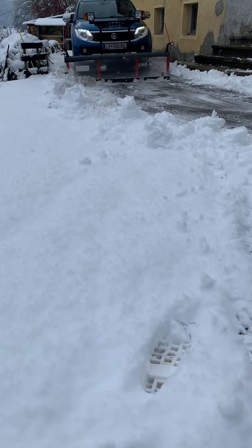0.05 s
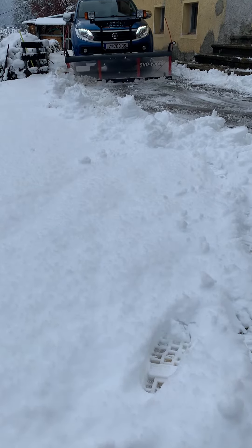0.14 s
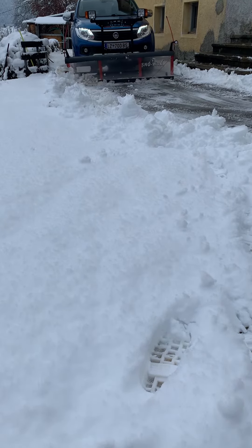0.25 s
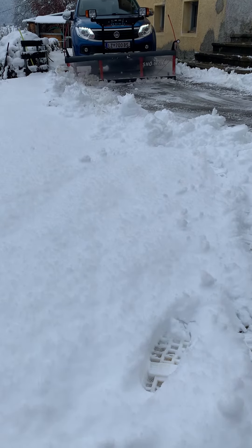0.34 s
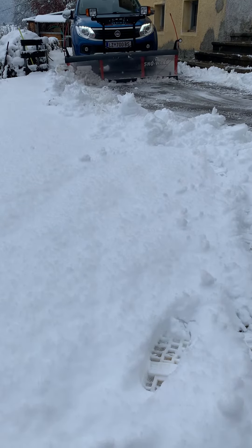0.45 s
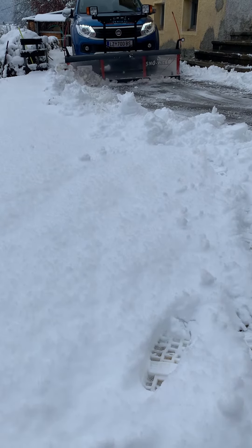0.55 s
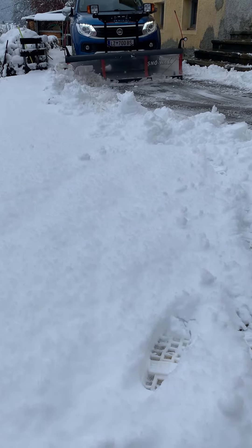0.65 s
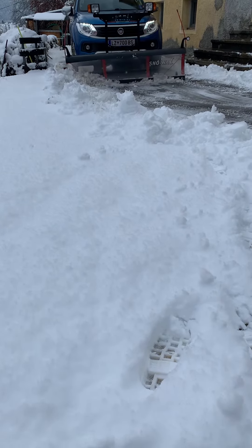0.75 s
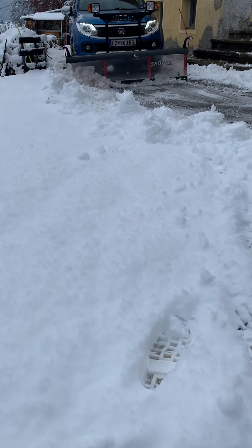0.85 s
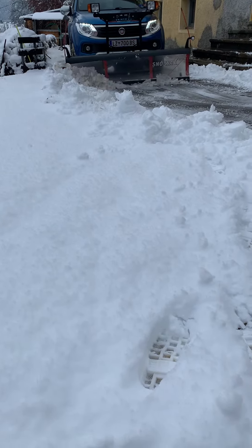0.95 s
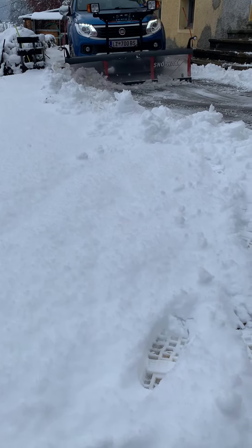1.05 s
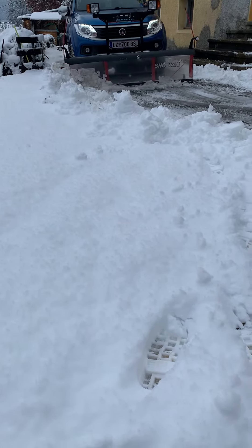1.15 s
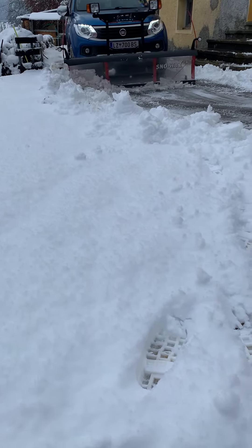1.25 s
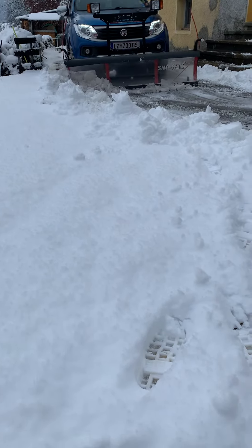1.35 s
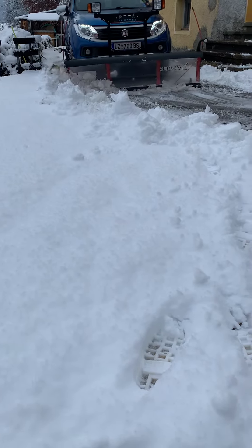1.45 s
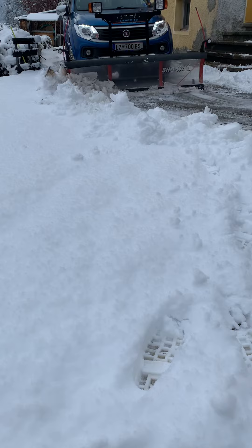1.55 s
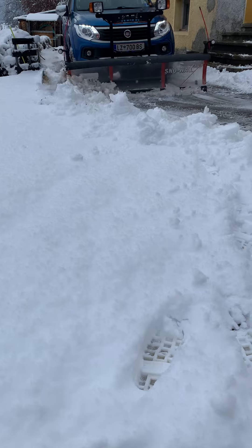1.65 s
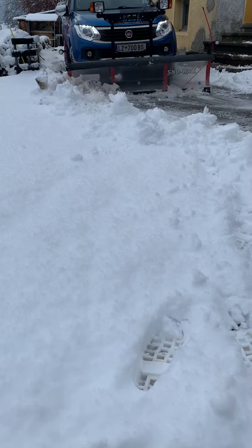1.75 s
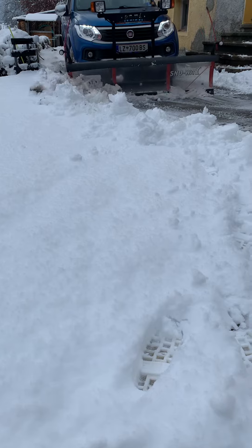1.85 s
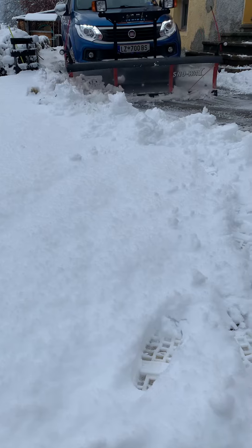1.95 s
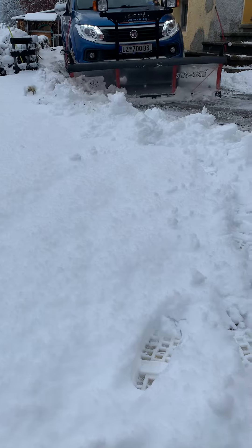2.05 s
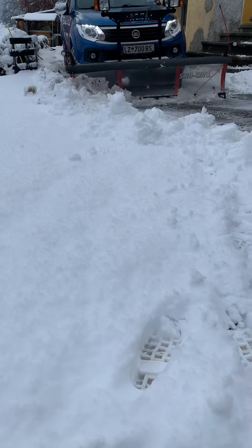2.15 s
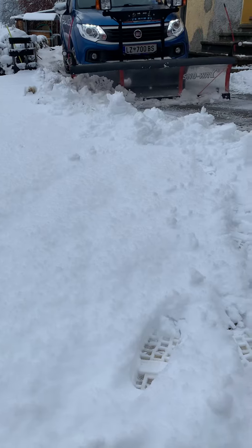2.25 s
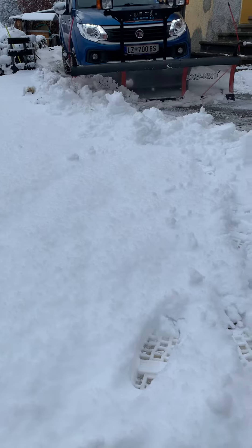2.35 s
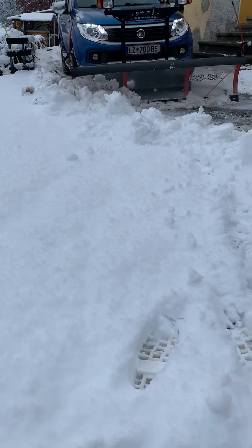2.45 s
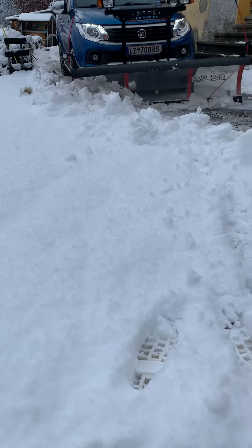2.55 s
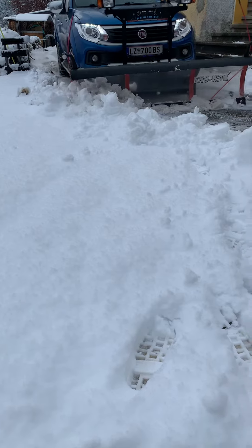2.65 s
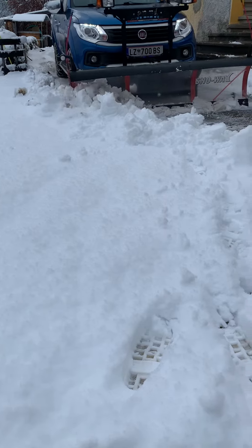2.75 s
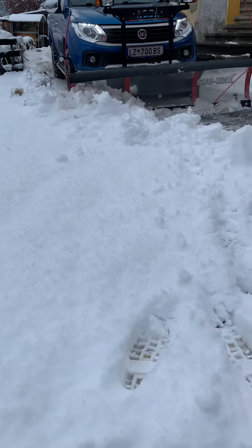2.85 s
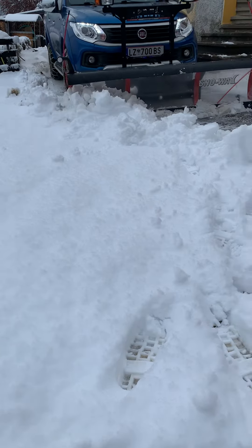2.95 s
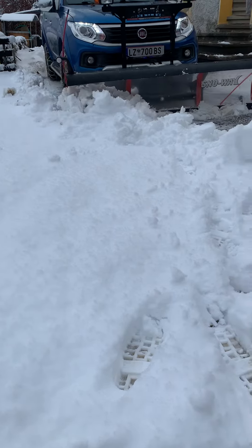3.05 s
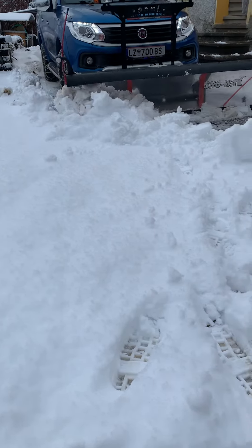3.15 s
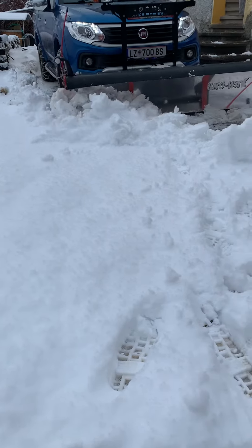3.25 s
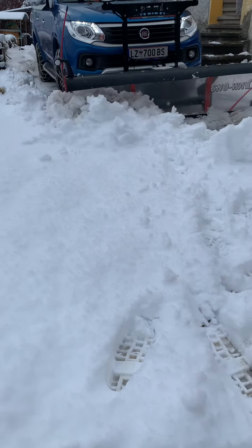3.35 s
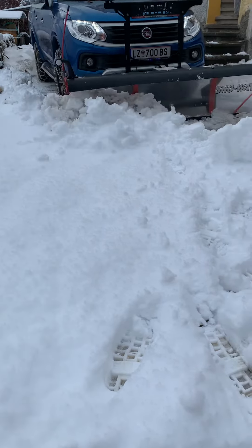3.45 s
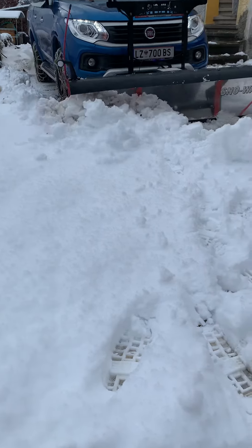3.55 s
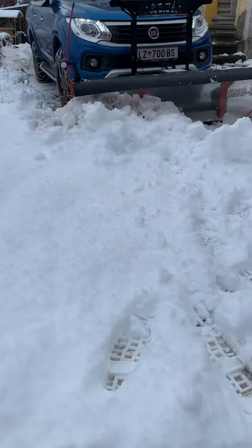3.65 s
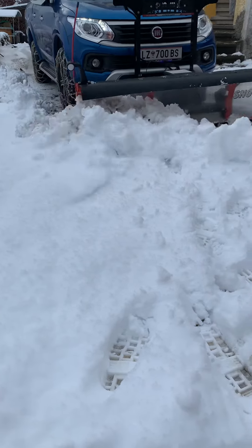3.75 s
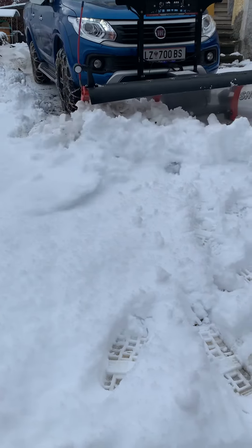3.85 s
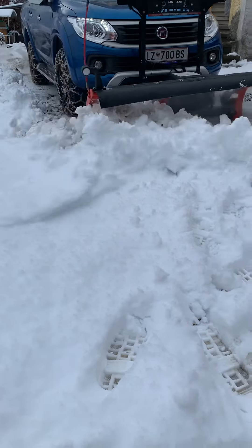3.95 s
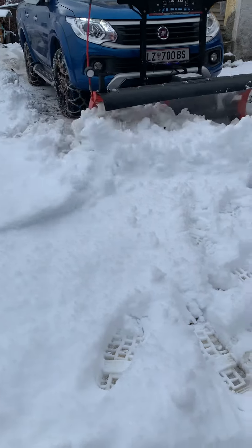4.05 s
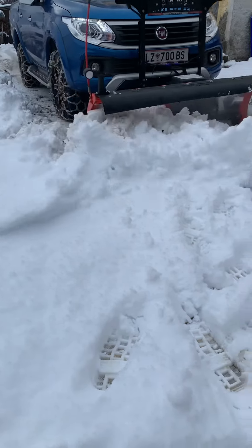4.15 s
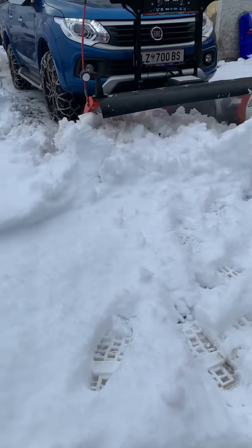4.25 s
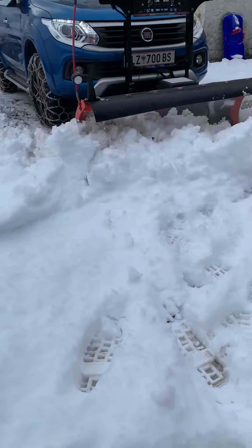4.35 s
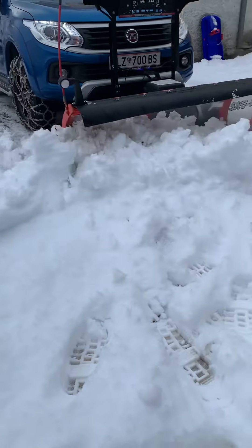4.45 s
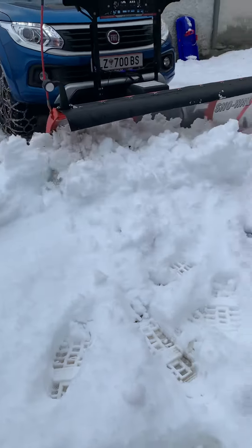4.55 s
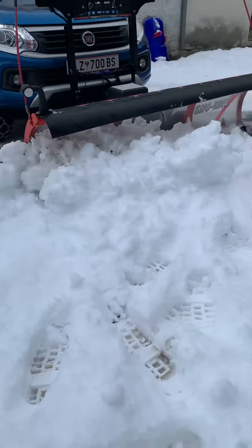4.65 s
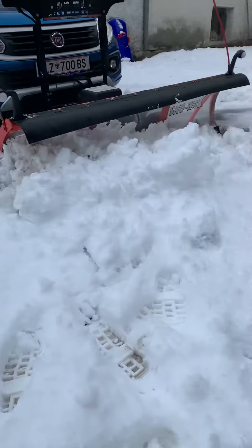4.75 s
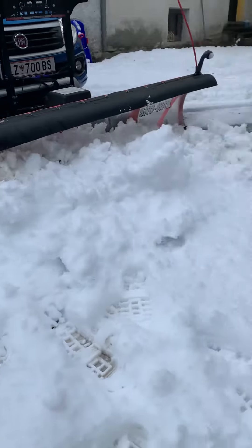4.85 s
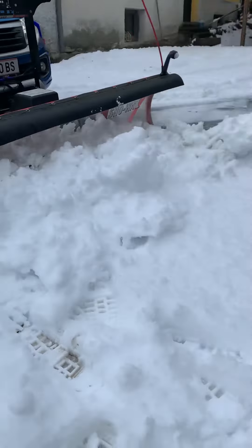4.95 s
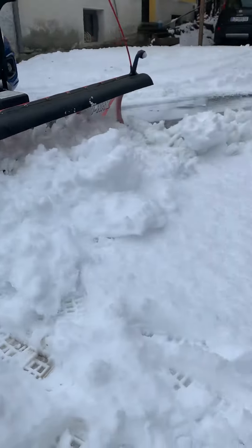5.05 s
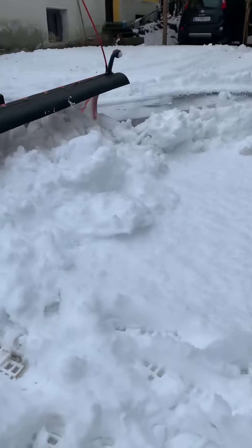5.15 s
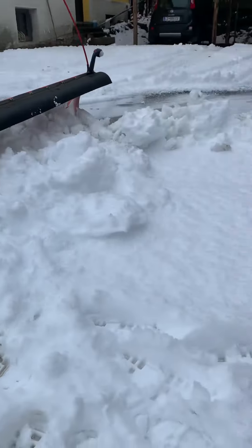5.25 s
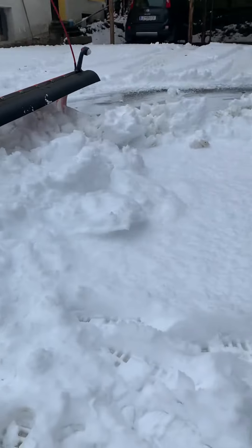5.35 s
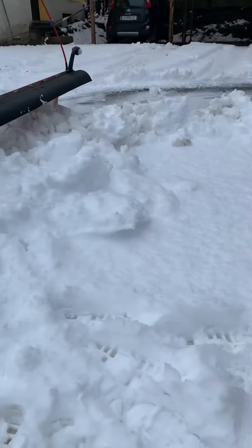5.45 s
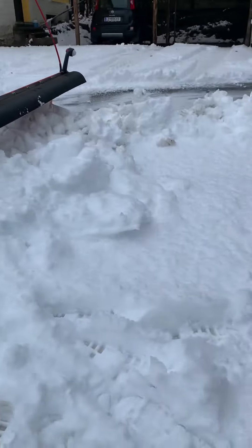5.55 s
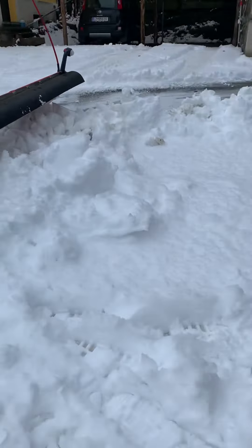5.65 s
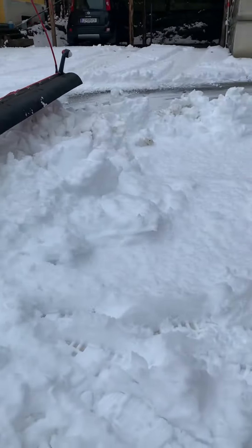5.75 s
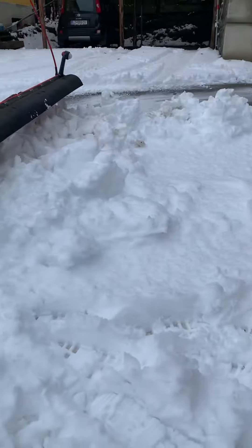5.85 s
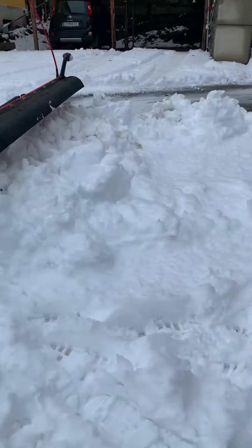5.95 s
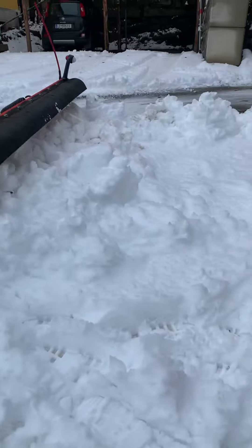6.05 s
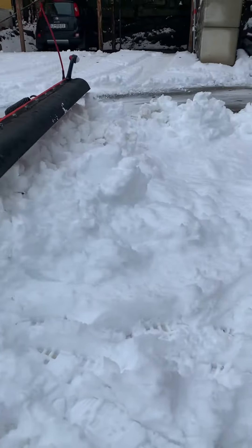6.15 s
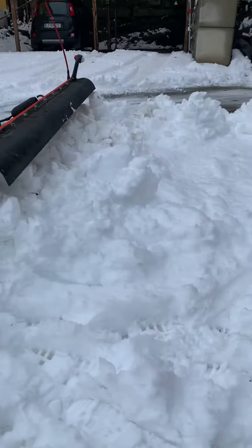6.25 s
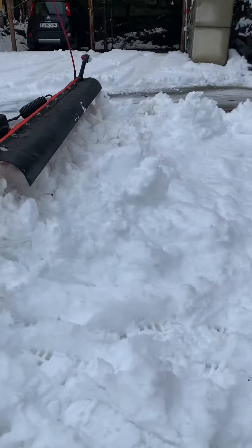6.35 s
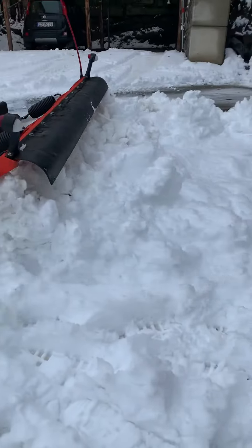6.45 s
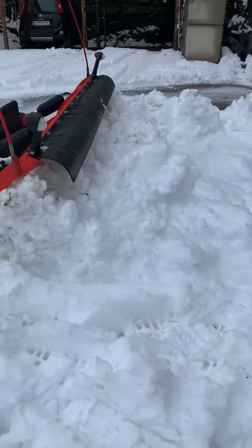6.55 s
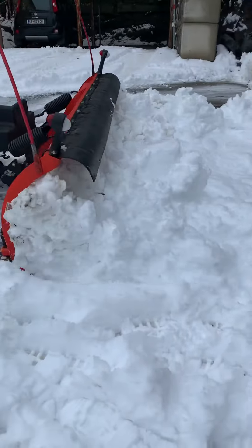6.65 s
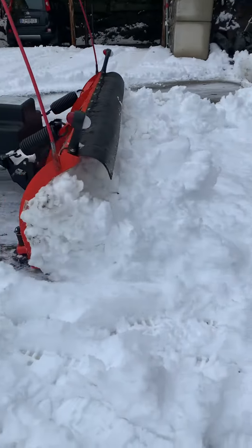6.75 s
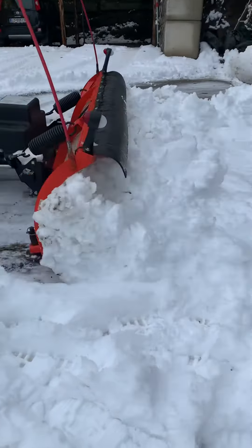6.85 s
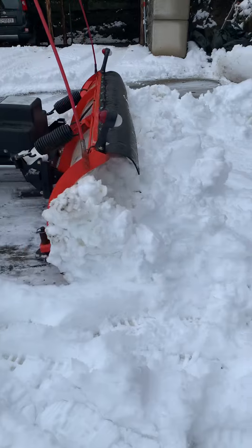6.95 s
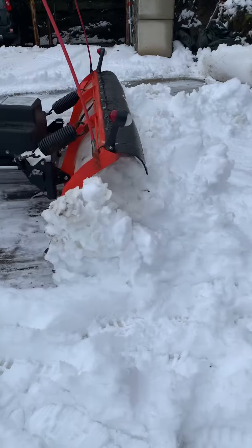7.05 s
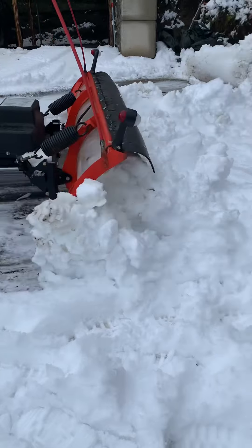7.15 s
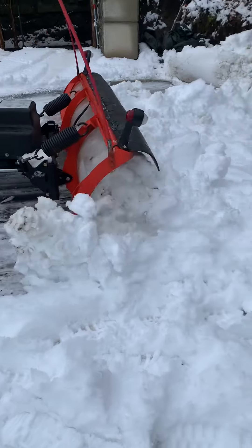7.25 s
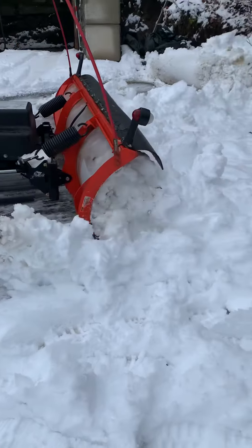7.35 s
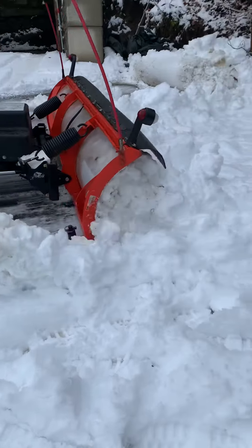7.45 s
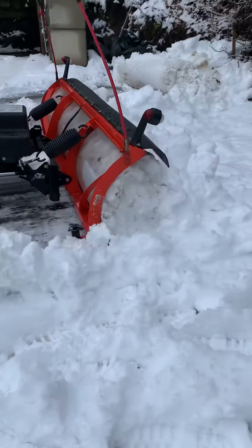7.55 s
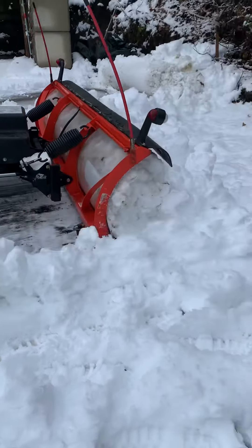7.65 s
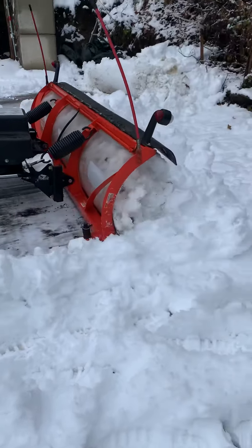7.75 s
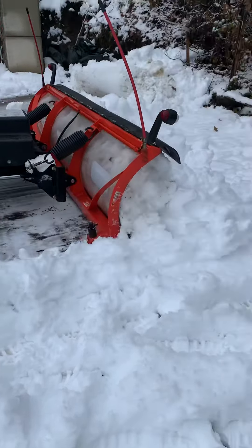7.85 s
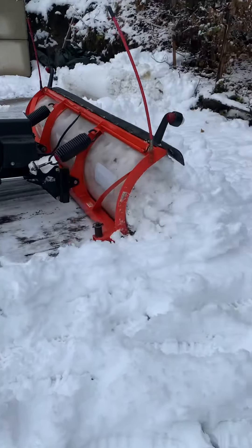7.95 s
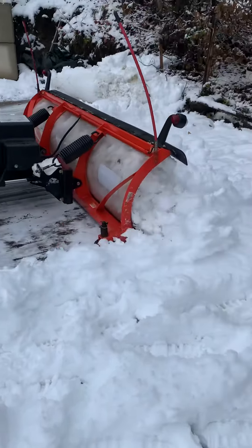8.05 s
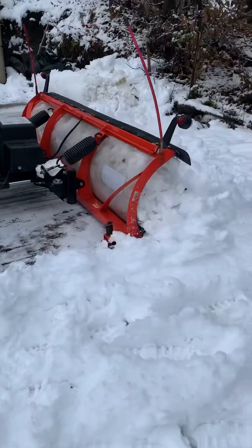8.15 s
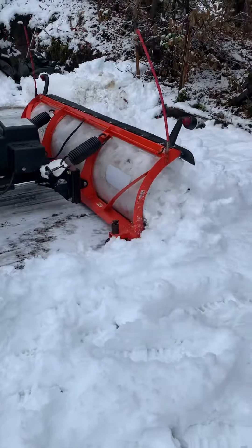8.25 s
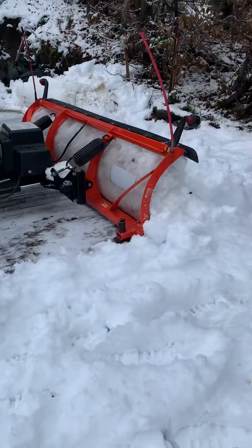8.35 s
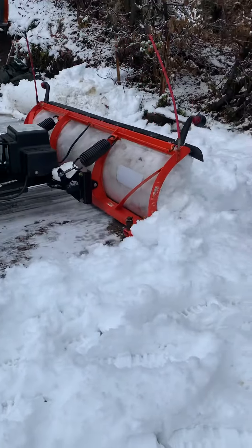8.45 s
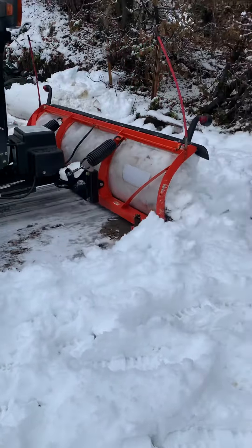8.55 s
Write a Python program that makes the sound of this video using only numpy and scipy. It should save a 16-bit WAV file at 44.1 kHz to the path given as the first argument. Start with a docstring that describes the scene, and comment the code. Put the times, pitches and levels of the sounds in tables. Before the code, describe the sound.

A rough, juddering metal scrape dominates, swelling as the edge bites into packed snow and briefly thinning when it lifts. Sharp knocks, brittle ice cracks and deep short thuds break through, over low diesel tones, clatter and a faint whine. It is heard close outdoors in stereo, with slight reflections from nearby walls. Finally the blade stops and the engine idles on.

```python
"""A steel plough blade scrapes along a snowy lane: it judders over the paving and rings, in random slips.
Noise shakes its resonances, and the same slips crush the snow; ice cracks and sudden catches stand out.
The frame thuds in short damped waves, and the diesel pickup adds exhaust tones, clatter and a faint whine.
The truck passes a phone held a few metres off, then stops: the scraping drops and the engine idles on."""
import sys
import numpy as np
from scipy import signal
from scipy.fft import rfft, irfft, next_fast_len
from scipy.io import wavfile
from scipy.ndimage import uniform_filter1d, map_coordinates

SR = 44100
rng = np.random.default_rng(int(sys.argv[2]) if len(sys.argv) > 2 else 0)


def transcribe(u):
    """Save the signal u as a 16-bit wav file named by the first command-line argument.

    u: samples, shape (n,) or (channels, n), limited to [-1, 1]; the rate is SR.
    q: integer samples, one column per channel.
    """
    v = np.clip(np.atleast_2d(u).T, -1, 1)
    q = np.round(v * 32767).astype(np.int16)
    wavfile.write(sys.argv[1], SR, q)


def ratio_of_db(decibels):
    """Turn decibels (scalar or array-like) into linear amplitude factors; 0 dB maps to 1."""
    return 10 ** (np.asarray(decibels, float) / 20)


N = 378812
T = np.arange(N) / SR
LENGTH = next_fast_len(N)
BINS = np.arange(LENGTH // 2 + 1) * SR / LENGTH  # frequencies in Hz
SPAN = 2 * (len(BINS) - 1)  # transform length
PASSED = np.interp(T, (4.61, 5.14), (0, 1))  # 0 = truck ahead, 1 = alongside


def unit(x):
    """Scale to rms 1."""
    return x / np.sqrt(np.mean(x ** 2))


def noise():
    """White noise."""
    return rng.standard_normal(N)


def turned(ahead_db, beside_db):
    """Gain that changes as the blade turns past."""
    ahead, beside = ratio_of_db(ahead_db), ratio_of_db(beside_db)
    return ahead + (beside - ahead) * PASSED


def ring(x, modes, widen, drift=0., tilt=((0, 1), (0, 0)), pivot_hz=620):
    """Sum of two-pole resonances; each can swell and fade as the load on the steel shifts."""
    out, knots = 0, np.arange(0, T[-1] + 1, .08)
    tilt_db = np.interp(knots, tilt[0], tilt[-1])  # per octave above pivot_hz
    for k, (hz, width, ahead_db, beside_db) in enumerate(modes):
        b, a = signal.iirpeak(hz, hz / (widen * width), SR)
        swell_db = drift * rng.standard_normal(len(knots)) + tilt_db * np.log2(hz / pivot_hz)
        gain = np.interp(T, knots, ratio_of_db(swell_db)) * turned(ahead_db, beside_db)
        out = out + (-1) ** k * gain * signal.lfilter(b, a, x)
    return out


def bursts(times, sizes, decay_s, rise_s):
    """Envelope of sudden onsets that die away."""
    spikes = np.bincount((np.asarray(times) * SR).astype(int), sizes, N)[:N]
    fall, rise = np.exp(-1 / (decay_s * SR)), np.exp(-1 / (rise_s * SR))
    fading = signal.lfilter([1], [1, -fall], spikes)
    return signal.lfilter([1 - rise], [1, -rise], fading)


def grit(rate, spread_db, decay_s):
    """Random slips (rate per second): a steady bed with sudden grains of widely spread size on top."""
    chance = rng.random((int(rate * N / SR), 2))
    size_db = spread_db * np.minimum(-np.log(chance[:, 1]), 4.3)  # capped so no grain is huge
    grains = bursts(chance[:, 0] * T[-1], ratio_of_db(size_db), decay_s, 0.0006)
    return unit(1.02 + unit(grains))


# Resonances of the steel, low to high: (f/Hz, width/Hz before each use widens or narrows it,
# relative level/dB while the truck is ahead, relative level/dB once alongside)
MOUNT_MODES = [(59.5, 37, -5.5, -5.5), (77.8, 18.5, -2, 3), (95, 18.2, 1, 0.5)]
FRAME_MODES = [(125, 29, -1.5, 0), (159, 29.5, -0.5, -1), (199, 41.4, -0.5, -1.5), (255, 69, -6, -3.5)]
PANEL_MODES = [(342.5, 90, -3, -2), (441, 118, -3.5, -2), (541.5, 84, -1, -0.5), (651, 62.5, -3, -3.5),
               (701, 61.4, -1.5, -2), (837, 104, -3, -3.5), (978, 164, -8, -7.5)]
EDGE_MODES = [(1164, 160, -1.5, -3.5), (1419, 56, 2, 1.5), (1517, 92, 3, 0.5), (1694, 105, 1.5, -1),
              (1800, 67, 0, 3), (2020, 183, -5, -1), (2230, 223, -6.5, -3), (2545, 270, -12, -8),
              (3084, 194, -8, -8.5), (3560, 520, -21, -20), (4390, 280, -39, -16.5)]


def blade(crunch_hiss):
    """Stick-slip of the edge shakes mount, frame, panel and edge; the same slips crush the snow."""
    slips, grains = grit(40, 7.5, 0.013), grit(320, 3.7, 0.0031)
    # the powers below set how strongly each kind of slip shakes a part
    boom_push = noise() * grit(14, 1.1, 0.0063) ** .5
    boom = ring(boom_push, MOUNT_MODES, 0.85)
    rumble_push = noise() * slips ** 0.35 * grit(60, 1.9, 0.0071) ** 0.31
    rumble = ring(rumble_push, FRAME_MODES, 0.93)
    panel_push = noise() * slips ** 0.13 * grit(200, 3.8, 0.0016) ** .5
    panel = ring(panel_push, PANEL_MODES, 1.0, drift=1.87, tilt=np.transpose(DRAG_LEVELS))
    edge_push = noise() * slips ** 0.2 * grains ** 0.45 * grit(50, 1.9, 0.0075) ** 0.36
    edge = ring(edge_push, EDGE_MODES, 0.82, drift=2.04, tilt=np.transpose(SLIDE_LEVELS), pivot_hz=1700)
    crackle = unit(ring(noise() * grit(120, 5.1, 0.0018) ** 1.38, EDGE_MODES, 1.8))
    scrape = unit(edge) + crackle * turned(-9, -2.5)
    snow = crunch_hiss * slips ** 0.59 * grains ** 0.2 * grit(25, 3.9, 0.01) ** 0.39
    layers = (boom, rumble, panel, scrape, snow)
    return sum(ratio_of_db(db) * unit(layer) for db, layer in zip(drag_db(), layers))


# Slow levels of the sliding steel, before bites, lifts and the stop:
# (t/s, mount boom level/dB, frame rumble level/dB, panel ring level/dB, panel tilt in dB per octave)
DRAG_LEVELS = [(0, -12.5, -17, -19, 0.5), (.4, -40, -20.5, -16, -0.5), (1.0, -19.5, -17.5, -18, 0.5),
               (1.6, -21.5, -16.5, -25, 3), (2.0, -16, -20, -20, 1), (2.45, -25.5, -18, -20, 4),
               (2.8, -22.5, -20, -21, 2.5), (3.2, -19.5, -16.5, -20, 2.5), (3.8, -19.5, -20.5, -23.5, -3.5),
               (4.2, -19, -19.5, -21, -5), (4.6, -21, -21.5, -24.5, -1.5), (5.0, -23.5, -25.5, -24.5, -4),
               (5.3, -21, -21.5, -26, -3.5), (6.0, -23, -25.5, -25.5, 2.5), (6.8, -22, -21.5, -24.5, 2),
               (7.4, -23.5, -25.5, -23, -2), (8.0, -22, -24, -26, 1)]
# The same for edge and snow: (t/s, scrape level/dB, crunch level/dB, edge tilt in dB per octave)
SLIDE_LEVELS = [(0, -29, -42.5, 1), (1.4, -27.5, -39, -0.7), (2.8, -30, -40.5, -0.5),
                (3.7, -30.5, -41, 1.5), (4.3, -31, -40.5, 8.5), (5.6, -29.5, -38.5, -1.9),
                (6.9, -27, -39, -2), (7.5, -30, -33, 4.5), (8.0, -30, -34.5, 5), (8.1, -31.5, -36, 4)]
# The edge bites into packed snow: (t/s of the peak, swell level/dB before the shares, rise/s, fade/s)
BITES = [(.1, 14, 0.38, 0.3), (1.21, 8, 0.066, 0.2), (1.66, 14, 0.16, 0.09), (2.02, 10, 0.037, 0.53),
         (2.64, 10, 0.024, 0.17), (3.08, 9, 0.11, 0.49), (3.24, 17, 0.024, 0.5), (3.62, 7, .1, 0.12),
         (3.89, 7, 0.035, 0.043), (4.1, 16, 0.046, 0.11), (4.21, 18.5, 0.24, 0.12),
         (4.58, 13.5, 0.053, 0.048), (4.72, 10, 0.023, 0.3), (5.07, 11.5, 0.45, 0.1),
         (6.03, 4, 0.15, 0.099), (6.27, 11.5, 0.025, 0.11), (6.39, 9.5, 0.083, 0.025),
         (6.87, 9, 0.17, 0.083)]
# The edge rides up and loses contact: (from t/s, to t/s, loss level/dB before the shares)
LIFTS = [(1.707, 1.98, 4), (3.17, 3.218, 3), (6.134, 6.222, 2), (6.458, 6.648, 5.5),]
# Share of each swell or loss, then loss level/dB at the stop: (boom, rumble, ring, scrape, crunch)
BITE_SHARES = (0.11, 0.18, 0.059, 0.37, 0.88)
LIFT_SHARES = (0.47, 0.9, 1, 0.74, 0.56)
STOP_LOSS_DB = (22, 18, 15, 9.4, 11.3)


def drag_db():
    """Levels of boom, rumble, ring, scrape and crunch: slow trend, up in bites, down in lifts and at the stop."""
    steel_s, *steel_db, _ = np.transpose(DRAG_LEVELS)
    slide_s, *slide_db, _ = np.transpose(SLIDE_LEVELS)
    trends = [np.interp(T, steel_s, c) for c in steel_db] + [np.interp(T, slide_s, c) for c in slide_db]
    swells = [np.interp(T, (at - rise_s, at, at + fade_s), (0, db, 0)) for at, db, rise_s, fade_s in BITES]
    bite_db = np.max(swells, axis=0)
    ramp_s = 0.014
    lift_db = sum(np.interp(T, (a - ramp_s, a, b, b + ramp_s), (0, db, db, 0)) for a, b, db in LIFTS)
    stopped = np.interp(T, (8.05, 8.1), (0, 1))
    return [trend + up * bite_db - down * lift_db - stopped * loss
            for trend, up, down, loss in zip(trends, BITE_SHARES, LIFT_SHARES, STOP_LOSS_DB)]


# Spectrum of the crunch as heard at the phone, with a hollow near 10 kHz where the two ports cancel:
# (f/Hz, relative level/dB per Hz ahead, relative level/dB per Hz alongside)
CRUNCH_BANDS = [(2490, -25, -21), (3380, -4, -7), (3700, 3.5, 7.5), (4370, 2, 8), (5120, 1, 10),
                (5900, 0, 4.5), (8840, -5, -1), (9600, -32, -21), (10070, -31, -19), (10500, -9, -2.5),
                (13000, -4.5, -2.5), (14000, -3, -6), (14500, -30, -32)]


def crushed(patchy):
    """Crunch hiss: overlapping bands around each point of the table, each clumping on its own."""
    out, hz = 0, np.array(CRUNCH_BANDS)[:, 0]
    hiss = rfft(noise(), SPAN) * ((BINS > hz[0]) & (BINS < hz[-1] + 300))
    for k, (_, ahead_db, beside_db) in enumerate(CRUNCH_BANDS):
        band_shape = np.interp(BINS, hz, np.arange(len(hz)) == k)
        band = irfft(hiss * band_shape, SPAN)[:N]
        out = out + band * grit(25, 2.9, 0.014) ** patchy * turned(ahead_db, beside_db)
    return unit(out)


# A panel resonance that wanders downward as snow loads the blade: (t/s, f/Hz, level/dB)
LOADED_PANEL = [(0, 660.4, -40), (.27, 643.6, -20.5), (1.05, 658.7, -22.5), (1.3, 639.7, -30.5),
                (2.1, 639.7, -27), (3.7, 599.5, -29.5), (4.2, 591.5, -25), (4.6, 592, -23),
                (4.9, 579.6, -34.5), (8.05, 558.6, -60)]


def loaded_panel():
    """A narrow band of noise whose centre follows the load, broken up by slips."""
    s, hz, db = np.transpose(LOADED_PANEL)
    phase = 2 * np.pi * np.cumsum(np.interp(T, s, hz)) / SR
    keep = np.exp(-np.pi * 64 / SR)  # each of two equal poles is 64 Hz wide
    a, b = signal.lfilter([1], [1, -2 * keep, keep ** 2], rng.standard_normal((2, N)))
    band = a * np.cos(phase) + b * np.sin(phase)
    return ratio_of_db(np.interp(T, s, db)) * unit(band * grit(14, 3.6, 0.038) ** 0.61)


# The edge catches on paving and ice, each value before its envelope:
# (t/s, ring level/dB, ice spray level/dB relative to the ring, ring f/Hz)
KNOCKS = [(1.225, -16.5, -24, 1570), (1.443, -16.5, -15, 1465), (1.795, -23.5, -14, 800),
          (1.995, -30, -3, 800), (3.061, -16.5, -32, 880), (3.226, -13.5, -17, 1144),
          (3.279, -19, -15, 1495), (4.083, -19.5, -12, 1520), (4.122, -19, -19, 1810),
          (4.218, -18, -22, 1530), (4.698, -19.5, -14, 1567), (4.83, -20, -8, 1665), (4.88, -21.5, -8, 915),
          (4.936, -16, -13, 855), (5.016, -16, -17, 1765), (5.078, -21, -16, 1720), (5.264, -22, -11, 1380),
          (6.014, -18, -19, 920), (6.056, -19.5, -30, 808), (6.252, -13, -9, 1340), (6.265, -12, -23, 1055),
          (6.378, -9.5, -16, 1420), (6.531, -21.5, -20, 1800), (6.663, -20, -18, 880),
          (6.695, -18.5, -15, 1390), (6.798, -19.5, -17, 790), (7.549, -16, -15, 2020),
          (7.607, -17, -35, 1810), (7.91, -15.5, -17, 1490), (7.983, -19.5, -7.5, 1320),
          (8.36, -26.5, -45, 910)]


def knocks(spray):
    """Each catch is a short rattle in edge and panel, a tone at its own pitch and a spray of crushed ice."""
    s, db, spray_db, ring_hz = np.transpose(KNOCKS)
    steel = unit(ring(noise(), EDGE_MODES, 0.97)) + ratio_of_db(-2.0) * unit(ring(noise(), PANEL_MODES, 0.71))
    rattle = steel * bursts(s, ratio_of_db(db + 1.5), 0.01, 0.0025)
    out = rattle + spray * bursts(s, ratio_of_db(db + spray_db), 0.0099, .0004)
    t = np.arange(SR // 10) / SR
    shape = (1 - np.exp(-t / 0.0019)) * np.exp(-t / 0.014)
    for at, level_db, hz in zip(s, db, ring_hz):
        out[int(at * SR):][:len(t)] += ratio_of_db(level_db) * np.sin(2 * np.pi * hz * t) * shape
    return out


# Lumps of ice crack under the edge: (t/s, level/dB before the envelope)
CRACKS = [(0.1954, -34), (.2833, -28), (.5935, -32), (1.1388, -28), (1.282, -31), (1.8282, -23),
          (2.2887, -34), (2.65, -25), (3.0051, -23), (3.3568, -29), (3.4002, -26), (3.4984, -23),
          (3.707, -31), (3.883, -24), (4.0068, -24), (4.2577, -24), (4.3194, -28), (4.431, -24),
          (4.453, -36), (4.5391, -26), (4.7506, -24), (5.1937, -22), (5.3032, -23), (5.4311, -23),
          (6.103, -28), (6.4323, -26), (6.4802, -31), (7.018, -23), (7.509, -19.5), (7.638, -21),
          (7.6914, -30), (7.7704, -24), (7.891, -21)]


def cracks(spray):
    """Sharp, short bursts of crushed ice, with a tick in the blade edge."""
    s, db = np.transpose(CRACKS)
    tick = ratio_of_db(-1.5) * unit(ring(noise(), EDGE_MODES, 1.7))
    return (ratio_of_db(-10) * spray + tick) * bursts(s, ratio_of_db(db), 0.015, 0.00038)


# The frame drops back: (t/s, level/dB before the envelope, f/Hz)
THUDS = [(1.429, -9, 165), (1.618, -3.5, 96), (2.665, -6.5, 150), (3.229, -1, 91), (3.301, -2, 130),
         (3.523, -4, 106), (4.076, -2.5, 120), (4.214, 0, 83.4), (4.546, -1, 82.6), (4.695, -5, 103),
         (4.828, 0.5, 83), (4.877, -3, 97), (4.924, -3, 107), (5.007, 0.5, 80), (5.327, -10, 89.5),
         (5.63, -4.5, 74), (5.7, -5.5, 82.8), (6.656, -3, 119), (6.804, -0.5, 85), (6.839, -4, 91.3),
         (6.995, -5.5, 88), (7.424, -8.5, 95), (8.031, -15, 182), (8.22, -24, 263), (8.36, -19.5, 125)]


def thuds():
    """A few damped cycles of the frame bouncing."""
    out, t = np.zeros(N + SR), np.arange(SR // 4) / SR
    shape = (1 - np.exp(-t / 0.0043)) * np.exp(-t / 0.017)
    for s, db, hz in THUDS:
        out[int(s * SR):][:len(t)] += ratio_of_db(db) * np.sin(2 * np.pi * hz * t) * shape
    return out[:N]


def colour(x, table):
    """Filter by a table of (f/Hz, level/dB), falling away sharply outside it."""
    hz, db = np.transpose(table)
    curve_db = np.interp(np.log(BINS + 1), np.log(hz), db, db[0] - 41, db[-1] - 27)
    return unit(irfft(rfft(x, SPAN) * ratio_of_db(curve_db), SPAN)[:N])


def wander(window):
    """Slow random drift of rms 1, from noise averaged over a window of samples."""
    return unit(uniform_filter1d(noise(), window))


# Engine over time: (t/s, exhaust level/dB, clatter level/dB)
ENGINE_LEVELS = [(0, -35.5, -33.5), (6.0, -29.5, -43), (6.6, -35, -38), (8.1, -28.5, -37),
                 (8.59, -27.5, -42.5)]
# Exhaust note, which sags once the truck stands: (t/s, f/Hz)
EXHAUST_NOTE = [(8.1, 62.4), (8.59, 61.4)]
# Exhaust tones: (multiple of the note, level/dB relative to the exhaust level)
EXHAUST_ORDERS = [(1, 0), (1.5, -21), (2, -17), (3, -19)]
# Engine block clatter spectrum: (f/Hz, relative level/dB per Hz)
BLOCK_SPECTRUM = [(40, -20), (120, -12), (300, -3), (700, -15.5), (1400, -4.5), (2000, -22.5), (3000, -22),
                  (6000, -21.5), (15000, -50)]
# Gears and pump: (f/Hz, level/dB before the random flutter)
WHINE_TONES = [(673, -46), (906, -51), (1319, -54), (1378, -47), (1798, -49)]


def engine():
    """Clean exhaust orders, block clatter puffing with every second beat of the note, faint gear whine."""
    s, *columns = np.transpose(ENGINE_LEVELS)
    exhaust_db, clatter_db = (np.interp(T, s, c) for c in columns)
    turns = np.cumsum(np.interp(T, *np.transpose(EXHAUST_NOTE))) / SR
    waver = 1 + 0.068 * wander(SR // 12)
    exhaust = sum(ratio_of_db(db) * np.sqrt(2) * np.sin(2 * np.pi * k * turns + k * k) for k, db in EXHAUST_ORDERS)
    puffs = 0.77 + np.exp(-(turns / 2 % 1) / 0.33)
    clatter = unit(colour(noise(), BLOCK_SPECTRUM) * puffs)
    whine = 0
    for hz, db in WHINE_TONES:
        tone = np.sqrt(2) * np.sin(2 * np.pi * hz * T + wander(SR // 15))
        whine = whine + ratio_of_db(db) * tone * (1 + .5 * wander(SR // 8))
    return ratio_of_db(exhaust_db) * waver * exhaust + ratio_of_db(clatter_db) * clatter + whine


# Two microphone ports: (f/Hz, radians the left leads while the truck is ahead, radians once alongside)
PORT_LEAD = [(0, 0, 0), (1200, .1, .1), (2000, .3, .7), (2450, 1.0, 1.1), (2750, 3.1, 1.8),
             (3100, 3.1, 2.3), (3500, 2.2, 2.0), (4300, 2.2, 2.2), (4750, 2.5, 3.1), (5100, 3.0, 3.18),
             (5600, 4.2, 4.2), (6900, 6.3, 6.3), (9600, 9.42, 9.42), (12400, 12.5, 12.5),
             (15200, 15.7, 15.7)]
# Shading: (f/Hz, left minus right level/dB ahead, the same alongside, diffuse wall level/dB)
PORT_SHADE = [(57.8, -2.5, -2, -26), (210, -5, -5.5, -16), (368, 2, -0.5, -15.5), (675, -7, -5.5, -12.5),
              (1320, -1, -1, -30), (2460, 2.5, 1, -1.5), (2750, 0, 0, -24), (3100, 0, 0, -24),
              (3270, 3, -1, -9.5), (4530, 0, -3, -13), (4750, -5, 0, -18), (5150, 5, 1, -18),
              (5400, -0.5, 0, -8), (8660, 1, 1, -7), (10800, -2, -0.5, -31), (15000, 0, 1, -25)]


def direct_sound(sound):
    """Direct sound reaches the ports with a lag and a shading that change as the truck passes."""
    hz, *leads = np.transpose(PORT_LEAD)
    shade_hz, *shades_db, _ = np.transpose(PORT_SHADE)
    side = np.array([[.5], [-.5]])  # half of each difference goes to either port
    heard = []
    for lead, shade_db in zip(leads, shades_db):
        lag = np.exp(1j * side * np.interp(BINS, hz, lead))
        shading = ratio_of_db(side * np.interp(BINS, shade_hz, shade_db))
        heard.append(irfft(sound * lag * shading, SPAN)[:, :N])
    direct = (1 - PASSED) * heard[0] + PASSED * heard[1]
    # the lag also wanders, by 3 microseconds rms at its random points, as the contact moves along the blade
    knots = np.arange(0, T[-1] + 1, .07)
    sway = 0.000003 * SR * np.interp(T, knots, rng.standard_normal(len(knots)))
    return np.array([map_coordinates(x, [np.arange(N) + k * sway], mode="mirror")
                     for x, k in zip(direct, (.5, -.5))])


def walls(sound):
    """Walls smear the sound through a short fading noise tail, different on each side."""
    shade_hz, *_, diffuse_db = np.transpose(PORT_SHADE)
    tail = rng.standard_normal((2, SR // 4)) * np.exp(-np.arange(SR // 4) / SR / 0.0078)
    tail = rfft(tail / np.sqrt(np.sum(tail ** 2, axis=1, keepdims=True)), SPAN)
    return irfft(sound * tail * ratio_of_db(np.interp(BINS, shade_hz, diffuse_db)), SPAN)[:, :N]


def scene():
    """Add up blade, ice, frame and engine, then let them reach the phone directly and by the walls."""
    crunch = crushed(0.7)
    steel_and_ice = blade(crunch) + loaded_panel() + knocks(crunch) + cracks(crunch)
    sound = rfft(steel_and_ice + thuds() + engine(), SPAN)
    return direct_sound(sound) + walls(sound)


def low_pass(x):
    """Removes everything above the highest recorded frequency."""
    return signal.sosfilt(signal.butter(12, 15680, fs=SR, output="sos"), x)


def record(dry):
    """The phone cuts the deepest bass and rounds the loudest peaks."""
    bass_cut = signal.butter(4, 45, "high", fs=SR, output="sos")
    x = signal.sosfilt(bass_cut, dry)
    mix = np.tanh(0.76 * x) / 0.79
    return low_pass(mix)


dry = scene()
out = record(dry)
transcribe(out)
```